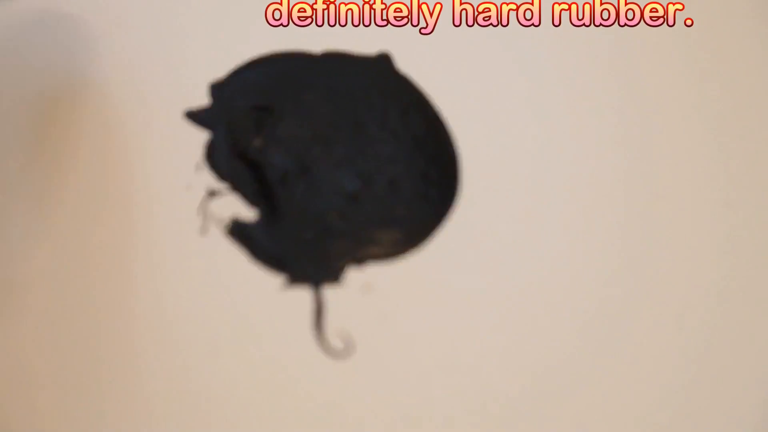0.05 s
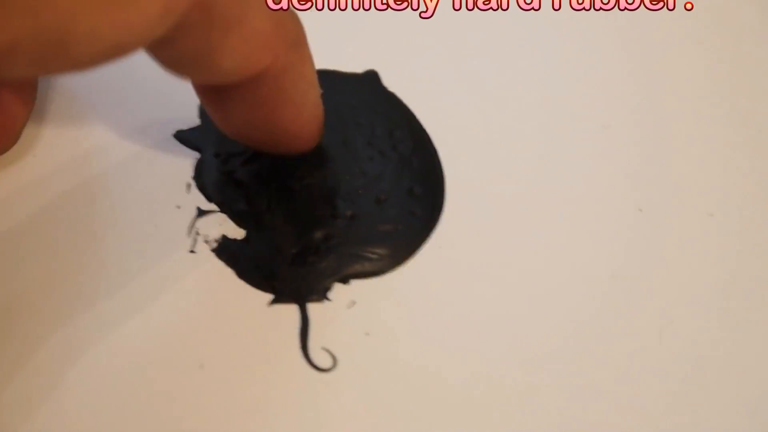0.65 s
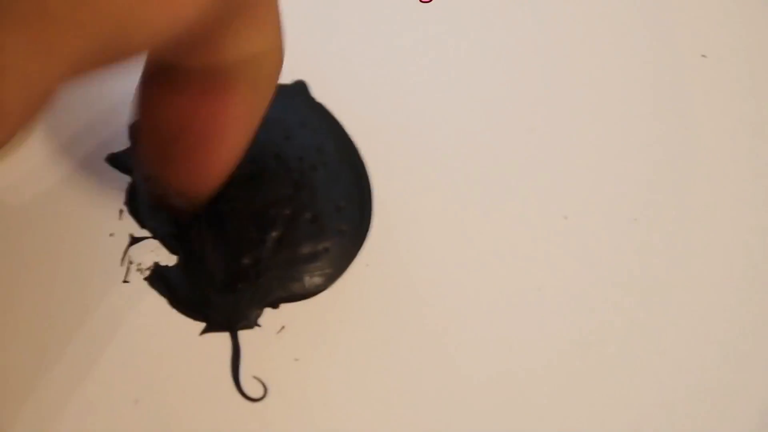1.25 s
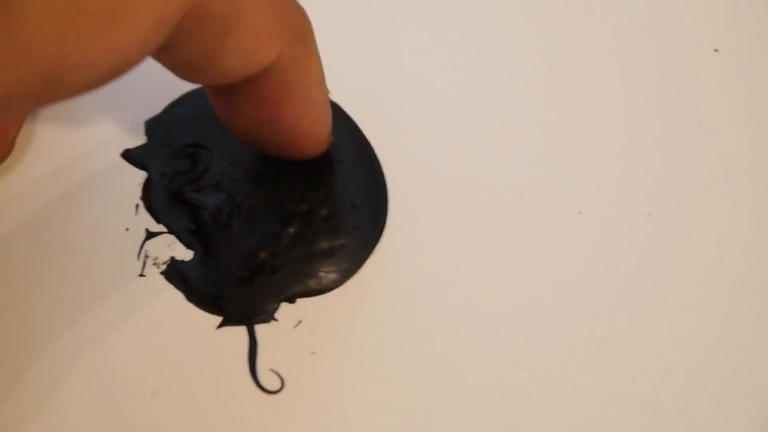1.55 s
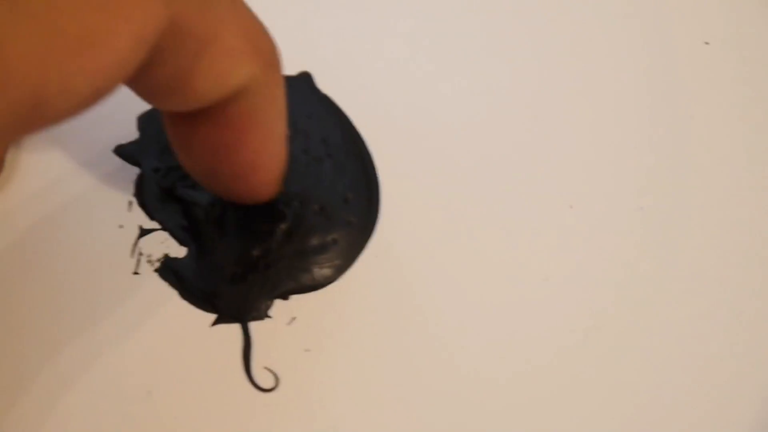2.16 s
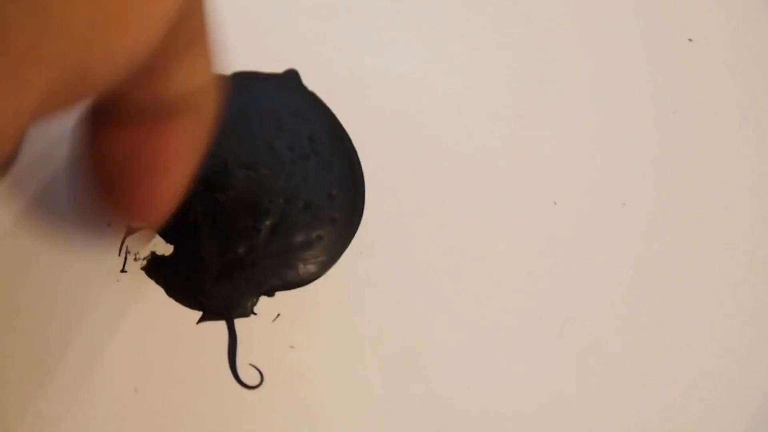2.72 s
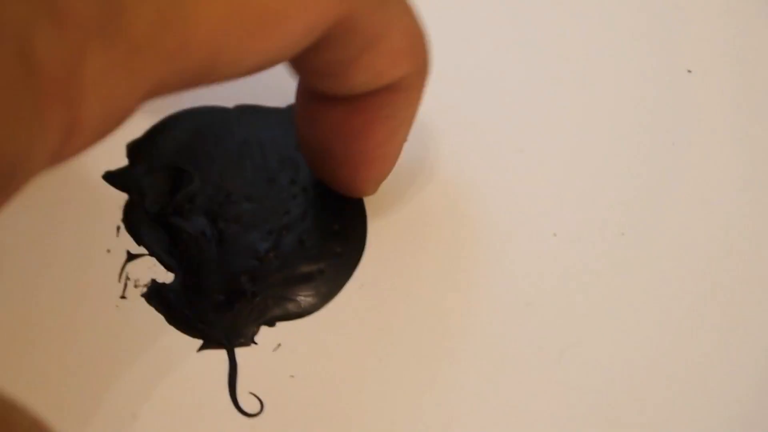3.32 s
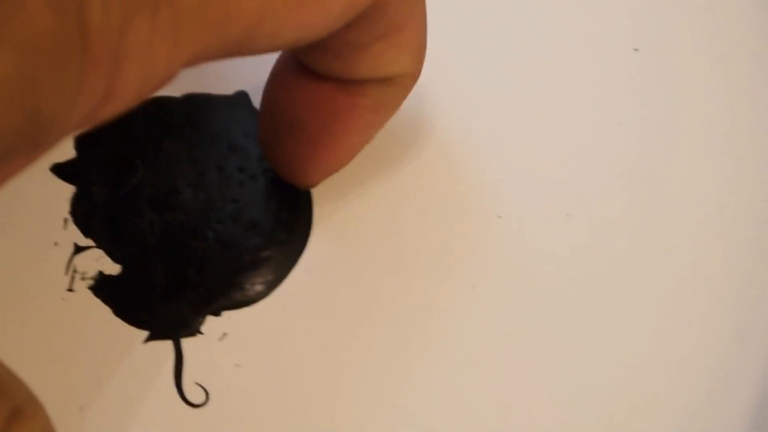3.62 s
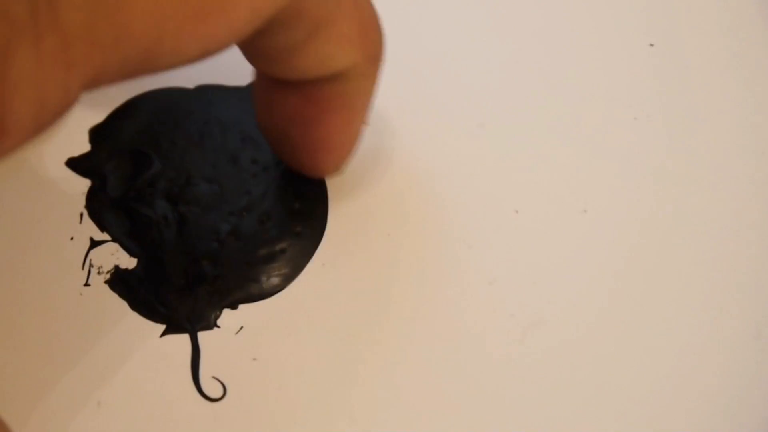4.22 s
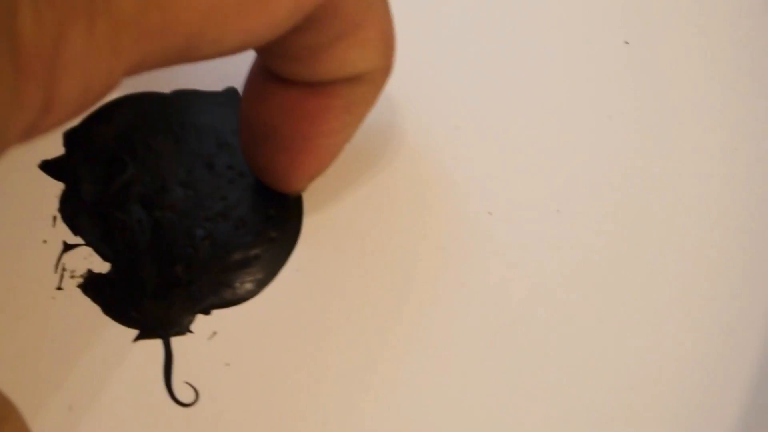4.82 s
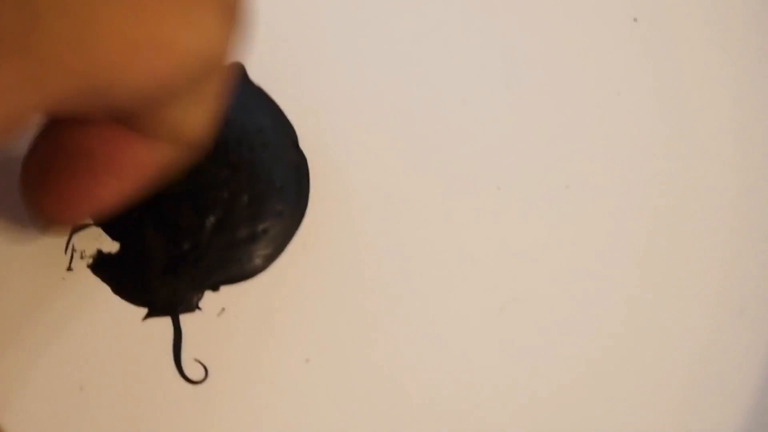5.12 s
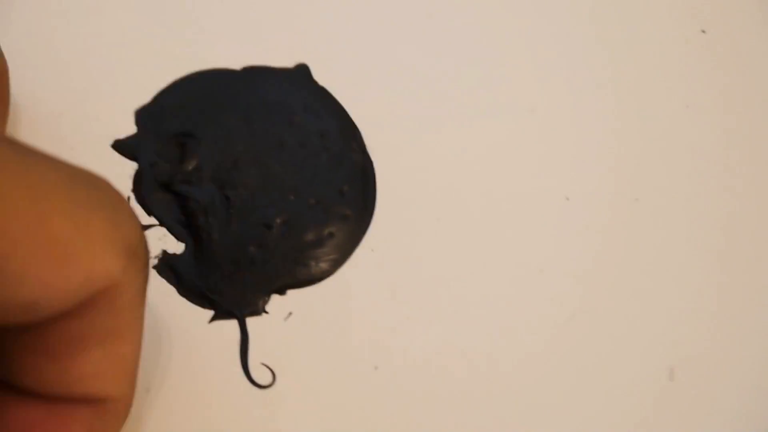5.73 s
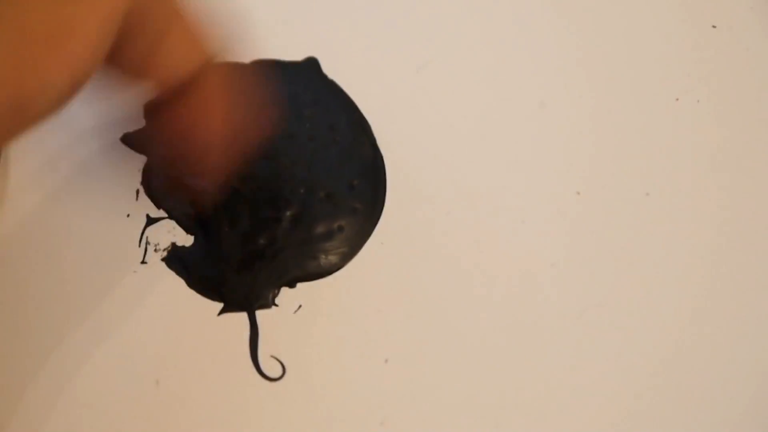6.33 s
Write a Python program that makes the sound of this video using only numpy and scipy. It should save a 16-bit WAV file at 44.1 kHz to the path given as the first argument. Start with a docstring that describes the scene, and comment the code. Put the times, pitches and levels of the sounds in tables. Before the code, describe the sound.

In a small, quiet room, a hand brushes faintly over a table and a finger lightly touches a lump of hard rubber. Then fingernail and pad strike it in a loose series of dry knocks, roughly one or two a second. Soft ticks and brief rasps of skin fall between them, with one very short squeak in a pause midway. The close microphone overloads a little on the hard taps, and a soft hiss continues throughout.

```python
"""A fingertip and its nail tap a blob of hardened rubber on a table: a dull knock, a thump and a crack.
Between taps the finger touches down lightly, drags over the rubber in tiny slips and squeaks once.
A small, dry room echoes briefly over a steady hiss. The microphone is so close that hard taps
overload it; each time, the recorder turns itself down and then creeps back up."""
import sys
import numpy as np
from scipy import signal
from scipy.fft import rfft, irfft, next_fast_len
from scipy.io import wavfile
from scipy.ndimage import map_coordinates

SR = 44100
rng = np.random.default_rng(int(sys.argv[2]) if len(sys.argv) > 2 else 0)


def inscribe(sig):
    """Save sig as 16-bit PCM at rate SR to the path in sys.argv[1].

    A 1-D sig is mono; a 2-D sig holds one channel per row.
    Samples are clipped to [-1, 1] before scaling.
    """
    pcm = np.round(np.clip(np.atleast_2d(sig).T, -1, 1) * 32767)
    wavfile.write(sys.argv[1], SR, pcm.astype(np.int16))


N = 285327
HIT = 2048  # samples in one contact

# The tone of skin brushing a surface: f/Hz, level/dB
SKIN_TONE = [(400, -16), (1500, 1), (3500, 2.5), (5500, -5), (8500, -8), (11000, -15), (15000, -16.5)]


def amp(db):
    """Turn decibels into a factor to multiply by."""
    return 10 ** (np.asarray(db) / 20)


def unit(x):
    """Scale x to an average strength (rms) of 1."""
    return x / np.sqrt(np.mean(x ** 2) + 1e-20)


def along(points, hz):
    """Read between (frequency, value) points, giving each octave equal space."""
    f, v = np.transpose(points)
    return np.interp(np.log(hz + 1), np.log(f + 1), v)


def filtered(x, response):
    """Multiply each frequency in x by response(hz)."""
    size = next_fast_len(len(x) + 4096)
    return irfft(rfft(x, size) * response(np.fft.rfftfreq(size, 1 / SR)), size)[:len(x)]


def coloured(x, points):
    """Shape the tone of x with (f/Hz, level/dB) points, at an average strength of 1."""
    return unit(filtered(x, lambda hz: amp(along(points, hz))))


def bass_cut(x, cut_hz=210):
    """A small shaking object gives off little bass."""
    return signal.sosfilt(signal.butter(3, cut_hz, "high", fs=SR, output="sos"), x)


def add(track, s, x):
    """Mix x into the track, starting at s seconds."""
    start = max(0, round(s * SR))
    track[start:start + len(x)] += x[:max(0, N - start)]


def background(split_hz=2500, low_hz=190, body_db=-56.0, treble_db=-63, fade_db_per_s=0.29):
    """Soft room hiss with little bass; it wavers slightly and very slowly grows fainter."""
    # The tone of the hiss: f/Hz, level/dB
    hiss_tone = [(200, -10), (227, -2.5), (347, -8), (366, 0.5), (424, -9.5), (519, -1), (569, -4),
                 (777, 1), (1450, -3.5), (2090, -7.5), (2210, -4.5), (13300, -23.5), (16000, -34.5)]
    t = np.arange(N) / SR
    tone = lambda hz: amp(along(hiss_tone, hz)) / np.sqrt(1 + (low_hz / (hz + 1)) ** 6)
    body = filtered(rng.standard_normal(N), lambda hz: tone(hz) / np.sqrt(1 + (hz / split_hz) ** 8))
    treble = filtered(rng.standard_normal(N),
                      lambda hz: tone(hz) / np.sqrt(1 + (split_hz / (hz + 1)) ** 8))
    waver_db = .5 * map_coordinates(rng.standard_normal(size=256), [t * 5])  # 5 new values a second
    return amp(waver_db - fade_db_per_s * t) * (amp(body_db) * unit(body) + amp(treble_db) * unit(treble))


def in_room(x, room_db, build_up_s=0.00075, wall_s=.0113, wall_db=-6):
    """The sound x, then an echo from one near wall and a short wash of blurred echoes."""
    # How long the room rings: f/Hz, time to fade by 60 dB/s
    fade_times = [(200, 0.14), (1000, 0.13), (4000, 0.12), (12000, 0.14)]
    # The tone of the echoes: f/Hz, level/dB
    echo_tone = [(60, -44.5), (140, -13), (260, -4), (420, -4.5), (800, 1), (2000, -2.5), (8000, 5),
                 (15000, 2)]
    hz, t, noise = signal.stft(rng.standard_normal(SR // 4), SR, nperseg=256)
    tail = signal.istft(noise * amp(-60 * t / along(fade_times, hz)[:, None]), SR, nperseg=256)[1]
    tail *= 1 - np.exp(-np.arange(len(tail)) / SR / build_up_s)
    tail /= np.linalg.norm(tail)
    tail[round(wall_s * SR)] += amp(wall_db)
    paths = amp(room_db) * filtered(tail, lambda hz: amp(along(echo_tone, hz)))
    paths[0] += 1  # the straight path to the microphone
    return signal.fftconvolve(x, paths)


def rustle(end_s=1.2, release_s=0.13, db=-62):
    """Skin brushes the table as the hand slides in, stopping just after the first tap."""
    moving = np.clip((end_s - np.arange(N) / SR) / release_s, 0, 1)
    return amp(db) * moving * bass_cut(coloured(rng.standard_normal(N), SKIN_TONE))


def knock(centre_hz, octaves, attack_s=.0001, stray_db=-17):
    """The blob's dull ring, peak 1: soft contacts wake its low notes, hard ones its high notes."""
    # The natural notes of the blob on the table: f/Hz, level/dB, time to fade by 60 dB/s
    blob_notes = [(260, -8.5, 0.017), (675, -1, 0.008), (993, 0, 0.0084), (1524, -0.5, 0.0071),
                  (2490, -0.5, 0.0082), (2905, -5.5, 0.014), (3280, -1, 0.0066), (4070, -5.5, 0.012),
                  (5800, -16, .007), (8600, -19.5, 0.0078)]
    t = np.arange(HIT) / SR
    hz, db, fade_s = np.transpose(blob_notes)[:, :, None]
    reach = 1 / (1 + np.abs(np.log2(hz / centre_hz) / octaves) ** 3)
    drive = amp(db) * (reach + amp(stray_db) * (hz < centre_hz))  # lower notes always stir a little
    sign = (-1) ** np.arange(len(hz))[:, None]  # neighbouring notes swing opposite ways
    ring = np.sum(sign * drive * amp(-60 * t / fade_s) * np.cos(2 * np.pi * hz * t), axis=0)
    pressure = bass_cut(ring * (1 - np.exp(-t / attack_s)), cut_hz=167)
    return -pressure / np.max(np.abs(pressure))


def crack(tone, top_hz, fade_s):
    """A burst of noise as nail or skin meets rubber; a blunter contact has less treble."""
    noise = coloured(rng.standard_normal(HIT), tone)
    grit = filtered(noise, lambda hz: 1 / np.sqrt(1 + (hz / top_hz) ** 4))
    return bass_cut(grit * amp(-60 * np.arange(HIT) / SR / fade_s), cut_hz=500)


def nail_ring():
    """The fingernail rings briefly when struck; peak 1."""
    # The natural notes of the nail: f/Hz, level/dB, time to fade by 60 dB/s
    nail_notes = [(2509, 2.5, 0.015), (2790, -5, 0.024)]
    t = np.arange(HIT) / SR
    notes = [amp(db - 60 * t / fade_s) * np.sin(2 * np.pi * hz * t) for hz, db, fade_s in nail_notes]
    ring = bass_cut(sum(notes))
    return ring / np.max(np.abs(ring))


def touch(db, centre_hz, tick_db):
    """The fingertip settles on the rubber or peels off it; a soft, low touch has a duller tick."""
    tick = amp(4) * crack(SKIN_TONE, top_hz=8 * centre_hz, fade_s=0.015) + amp(3) * nail_ring()
    return in_room(amp(db) * knock(centre_hz, octaves=0.87) + amp(tick_db) * tick, room_db=-11)


def fidgets(start_s=.3, end_s=5.4, per_s=2, spread_db=2, spread_octaves=.4):
    """The finger shifts its weight, making faint ticks at chance moments."""
    track = np.zeros(N)
    count = int((end_s - start_s) * per_s)
    for i, (when, size, pitch) in enumerate(rng.uniform(-1, 1, (count, 3))):
        s = start_s + (end_s - start_s) * (i + .5 + .5 * when) / count
        centre_hz = 1100 * 2 ** (spread_octaves * pitch)
        add(track, s, touch(-45 + spread_db * size, centre_hz, tick_db=-58 + spread_db * size))
    return track


def light_touches():
    """The finger lands gently and lifts off again around the taps."""
    # Landings and lift-offs: t/s, knock level/dB, centre f/Hz, tick gain/dB
    contacts = [(0.157, -23.5, 1420, -41.5), (0.17, -29, 1320, -44), (0.413, -39, 780, -44.5),
                (0.507, -34.5, 724, -49.5), (0.522, -31.5, 945, -55), (0.731, -21, 900, -40),
                (0.87, -41, 2310, -48), (0.955, -33, 2300, -57), (0.971, -34, 1500, -42),
                (1.062, -28, 1500, -52), (1.495, -36, 900, -51), (1.684, -33.5, 840, -39.5),
                (2.082, -27.5, 570, -64), (2.217, -36, 877, -51), (2.332, -31, 2300, -57),
                (2.579, -24.5, 482, -57), (2.775, -42, 974, -48), (3.037, -31, 1035, -40),
                (3.058, -35, 974, -50), (3.404, -40, 1060, -55), (3.782, -33, 1170, -47.5),
                (4.124, -28, 870, -42.5), (4.294, -31.5, 2400, -44.5), (4.354, -26, 1250, -35),
                (4.377, -32, 851, -42), (5.342, -35, 640, -64), (5.423, -18, 663, -45),
                (5.906, -25, 638, -47), (6.384, -17.5, 710, -39.5)]
    track = np.zeros(N)
    for s, db, centre_hz, tick_db in contacts:
        add(track, s, touch(db, centre_hz, tick_db))
    return track


def drags(scatter=.35, spread_db=3.5, snap_db=-8, nail_db=-4, press_share=0.19, release_share=0.12):
    """The finger sticks and slips unevenly; each slip rings blob and nail, over a fine hiss of skin."""
    # Strokes over the rubber: t/s, length/s, level/dB, centre f/Hz
    strokes = [(0.95, 0.053, -54.5, 1800), (1.738, .055, -57.5, 1200), (2.04, 0.19, -63, 1300),
               (2.857, 0.066, -53.5, 1800), (2.947, .032, -41, 1300), (2.972, .034, -36.5, 1100),
               (4.11, .02, -50, 990), (4.35, 0.046, -48, 1280), (5.311, 0.17, -59.5, 1200),
               (5.688, 0.15, -53, 2100)]
    track = np.zeros(N)
    for s, length_s, db, centre_hz in strokes:
        slips_per_s = 380 * 2 ** ((db + 38) / 11)  # a drag 11 dB gentler slips half as often
        n, count = int(length_s * SR), int(length_s * slips_per_s) + 1
        jitter, size = rng.standard_normal((count, 2)).T
        when = (np.arange(count) + .5 + scatter * jitter) * n / count
        slips = np.bincount(np.clip(when, 0, n - 1).astype(int), amp(spread_db * size), n)
        blob = unit(signal.fftconvolve(slips, knock(centre_hz, octaves=1.1))[:n])
        nail = unit(signal.fftconvolve(slips, nail_ring())[:n])
        rasp = blob + amp(snap_db) * coloured(slips, SKIN_TONE) + amp(nail_db) * nail
        hiss = amp(-32 + 0.48 * db) * coloured(rng.standard_normal(n), SKIN_TONE)
        pressure = np.interp(np.arange(n) / n, [0, press_share, 1 - release_share, 1], [0, 1, 1, 0])
        add(track, s, in_room(bass_cut((amp(db) * rasp + hiss) * pressure), room_db=-10))
    return track


def squeak(crest_s=2.972, rise_s=.023, fall_s=.011, db=-28, crest_hz=2480, sag_hz_per_s=11000,
           flutter_per_s=350, flutter_db=2.5, waver=.04):
    """In the firmest drag the slips fall in step with the nail's ring, making a fluttering tone."""
    t = np.arange(-rise_s, fall_s, 1 / SR)
    steps = (t - t[0]) * flutter_per_s
    chance = rng.standard_normal((int(steps[-1]) + 4, 2)).T
    grip, drift = [map_coordinates(row, [steps]) for row in chance]  # smooth random curves
    hz = (crest_hz - sag_hz_per_s * t) * (1 + waver * drift)  # the pitch sags as the finger slows
    swell = np.interp(t, [-rise_s, 0, fall_s], [0, 1, 0])
    tone = amp(db + flutter_db * grip) * swell * np.sin(2 * np.pi * np.cumsum(hz) / SR)
    track = np.zeros(N)
    add(track, crest_s - rise_s, in_room(tone, room_db=-12))
    return track


def thump(hz, cycles=2):
    """The soft finger pad pushes the air, dying away within a couple of swings; peak 1."""
    phase = hz * np.arange(HIT) / SR
    push = -np.sin(2 * np.pi * phase) * amp(-60 * phase / cycles)
    return push / np.max(np.abs(push))


def taps(room_db=-12, pad_room_db=-18, directions=3, rebound_s=0.00548, rebound_hz=740):
    """Nail and finger pad land together; the blob then slaps back on the table."""
    # Hard taps: t/s, knock level/dB, centre f/Hz, pad thump level/dB, crack level/dB,
    # crack top f/Hz, nail ring level/dB, rebound level/dB
    hard_taps = [(1.0840, -1, 1090, 2, 3, 13000, -24, -15.5), (1.7952, -3, 1120, 2, .5, 14500, -9, -16.5),
                 (2.5305, -9, 1090, 0, 0, 13500, -12.5, -14.5),
                 (3.4543, 3.5, 1260, -12.5, -5, 7000, -18, -31),
                 (3.8532, -1, 1780, -22, .5, 7900, -15, -20), (4.6041, -2.5, 793, -41, -25, 4500, -28, -31),
                 (5.0022, -1.5, 947, 2, -1, 9200, -16, -5), (5.6291, -3.5, 1520, -18, -7, 7000, .5, -30),
                 (6.0981, 1.5, 1080, -22, -1, 13000, -11, -16.5)]
    # The tone of the nail's crack: f/Hz, level/dB
    crack_tone = [(500, -6), (1500, -1.5), (3800, 4.5), (5000, -4.5), (6800, -11), (8400, -2.5),
                  (10500, -17), (13000, -9.5), (16000, -7.5)]
    track = np.zeros(N)
    for s, db, centre_hz, pad_db, crack_db, top_hz, ring_db, rebound_db in hard_taps:
        blow = amp(db) * knock(centre_hz, octaves=1.065) + amp(ring_db) * nail_ring()
        add(track, s, in_room(blow, room_db))
        pad_hz = 367 * 2 ** (-pad_db / 44.5)  # a heavier push flattens the pad for longer: a lower thump
        add(track, s, in_room(amp(pad_db) * thump(pad_hz), pad_room_db))  # stays mostly near the table
        for _ in range(directions):  # each part of the crack takes its own way round the room
            snap = amp(crack_db) / np.sqrt(directions) * crack(crack_tone, top_hz, fade_s=0.0042)
            add(track, s, in_room(snap, room_db))
        add(track, s + rebound_s, in_room(amp(rebound_db) * knock(rebound_hz, octaves=.6), room_db))
    return track


def scene():
    """All the sounds meet at one microphone."""
    return (background() + rustle() + taps() + light_touches() + drags() + squeak() + fidgets())[None]


def gain_control(x, overload=.6, boost_db=4, recover_db_per_s=2.5, react_s=0.0013):
    """Quiet sound is boosted; each overload takes the boost away, and it creeps back."""
    t = np.arange(N) / SR
    last_overload_s = np.maximum.accumulate(np.where(np.abs(x) > overload, t, -np.inf))
    cut_db = np.maximum(0, boost_db - recover_db_per_s * (t - last_overload_s))
    smoothing = np.exp(-1 / (react_s * SR))
    return x * amp(boost_db - signal.lfilter([1 - smoothing], [1, -smoothing], cut_db))


def record(dry, ceiling=0.89, top_hz=15300):
    """Hard taps outrun the gain control and clip flat; the wave is re-centred and its top treble cut."""
    clipped = np.clip(gain_control(dry[0]), -ceiling, ceiling)
    centred = signal.lfilter(*signal.butter(1, 1.2, "high", fs=SR), clipped)
    return filtered(centred, lambda hz: 1 / np.sqrt(1 + (hz / top_hz) ** 120))[None]


dry = scene()
out = record(dry)
inscribe(out)
```